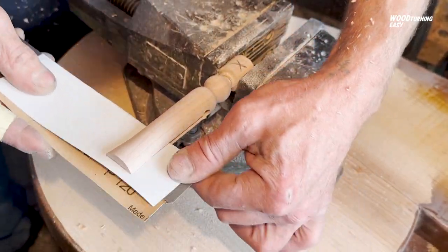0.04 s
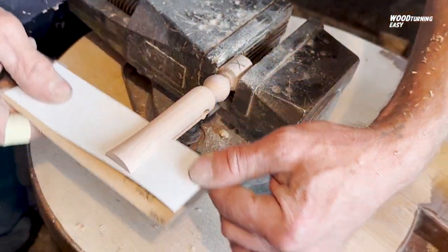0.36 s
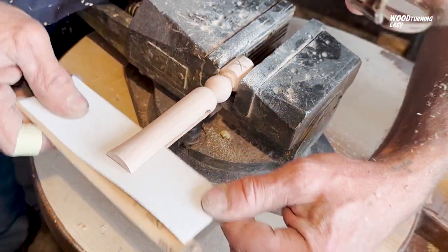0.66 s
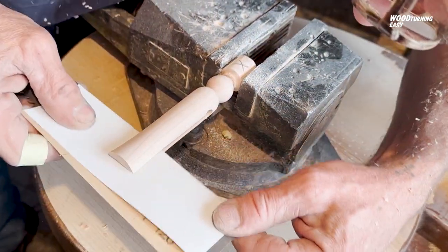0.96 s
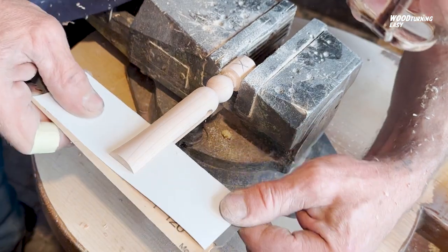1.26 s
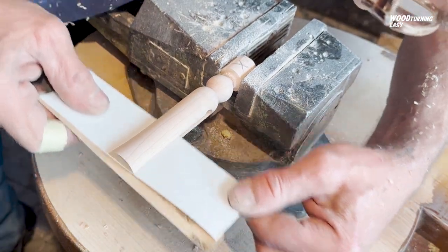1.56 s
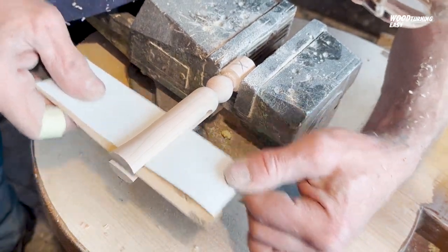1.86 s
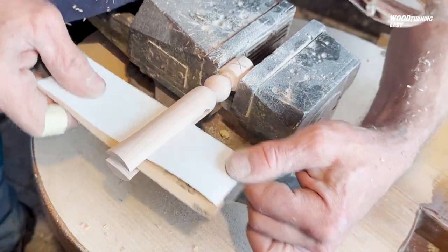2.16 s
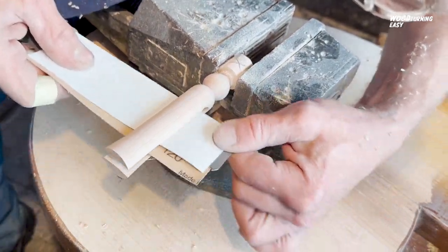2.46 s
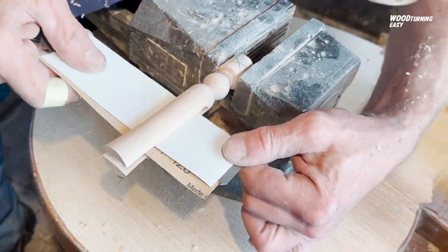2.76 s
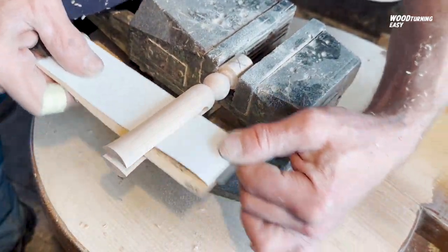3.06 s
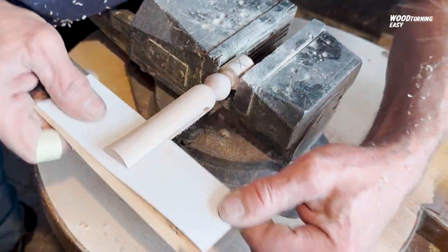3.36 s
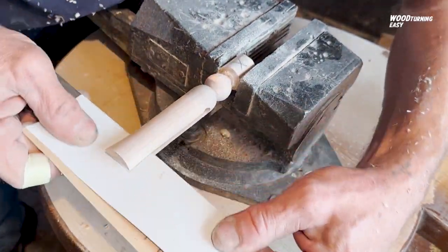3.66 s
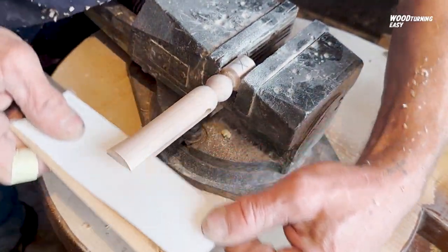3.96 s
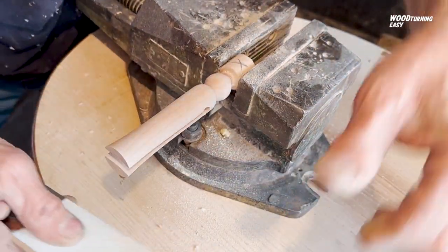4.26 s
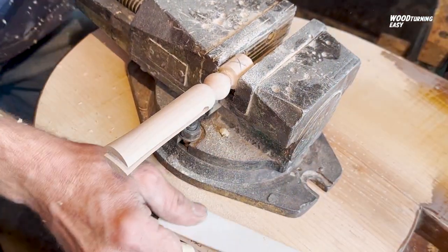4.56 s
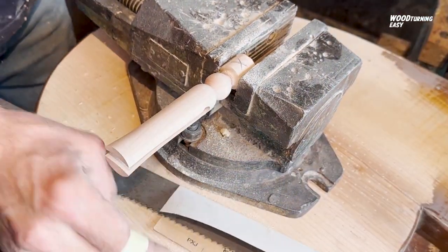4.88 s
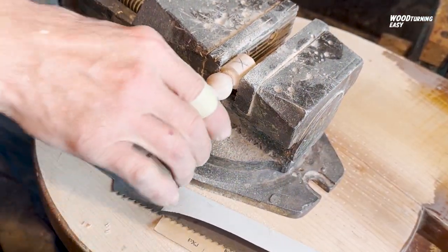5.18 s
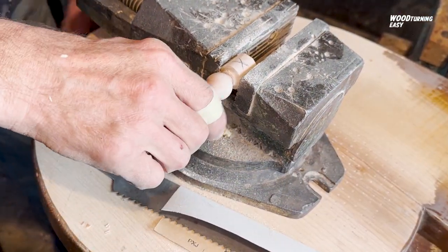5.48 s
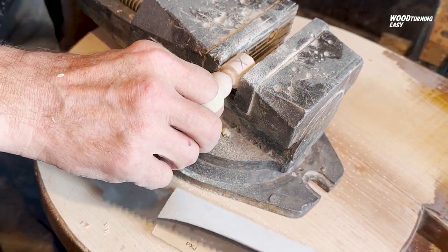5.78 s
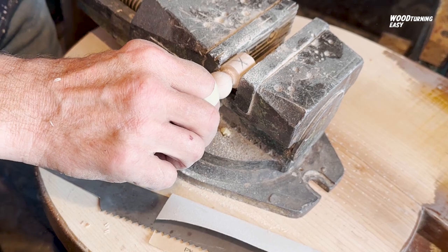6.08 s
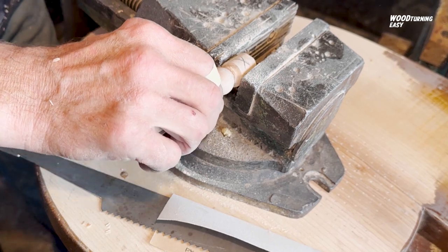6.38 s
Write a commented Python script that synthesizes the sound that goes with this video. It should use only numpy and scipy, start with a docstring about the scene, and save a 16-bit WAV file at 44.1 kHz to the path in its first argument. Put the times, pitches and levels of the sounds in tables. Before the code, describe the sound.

Close up in a small workshop, a strip of sandpaper is pulled rapidly back and forth under a wooden peg. The gritty rasp is broken by soft paper flaps and a few tiny squeaks. After about four seconds the sanding stops. Paper brushes the bench, an iron vice handle drops with a ringing clank, and the screw grates faintly. A hand thumps the work, then the loosened jaw rattles briefly.

```python
"""Sanding a wooden peg in a vice

A strip of sandpaper is pulled back and forth under a turned peg, close to a small stereo microphone.
The grit rasps, the strip flaps taut at the turns and now and then sticks and slips in a squeal.
Then the paper is laid down, a hand bumps the work and the bench, and the iron vice is loosened:
its handle drops, its screw grates and its jaw rattles."""
import sys
import numpy as np
from scipy import signal
from scipy.fft import rfft, irfft, next_fast_len
from scipy.io import wavfile
from scipy.ndimage import uniform_filter1d

SR = 44100
rng = np.random.default_rng(int(sys.argv[2]) if len(sys.argv) > 2 else 0)


def master(y):
    """Save y as 16-bit WAV."""
    cut = np.clip(np.atleast_2d(y).T, -1, 1)
    pcm = np.round(cut * 32767)  # scale
    wavfile.write(sys.argv[1], SR, pcm.astype(np.int16))


N = 283563

# strokes, to and fro in turn, the first already under way: start/s, stop/s, level/dB
STROKES = [(-.09, 0.038, -23.5), (0.067, 0.219, -28.5), (0.259, 0.409, -25.5), (0.433, 0.578, -26.5),
           (0.62, .759, -25.5), (0.787, 0.93, -28.5), (0.962, 1.105, -27), (1.14, 1.271, -27),
           (1.302, 1.413, -24.5), (1.467, 1.609, -27), (1.63, 1.763, -25), (1.8, 1.938, -25),
           (1.959, 2.06, -25.5), (2.136, 2.267, -26), (2.29, 2.45, -23.5), (2.471, 2.619, -25.5),
           (2.642, 2.749, -25), (2.819, 2.942, -25.5), (2.973, 3.111, -23.5), (3.151, 3.314, -24),
           (3.34, 3.477, -24), (3.509, 3.665, -23), (3.689, 3.818, -25.5), (3.851, 4.081, -25)]
# spectrum of grit on wood: f/Hz, level/dB
RASP_SPECTRUM = [(40, -24), (200, -40), (600, -17), (900, -10.5), (1700, -10.5), (2200, -7.5), (3300, -0.5),
                 (4200, -2.5), (5200, -4), (5900, 1), (7700, 0.5), (9000, -4), (11600, -3.5), (15700, -7)]
# resonances of the free length of paper at mid stroke: f/Hz, width/Hz, gain/dB
STRIP_RESONANCES = [(824, 31, 7), (1426, 330, 6.5), (1800, 100, 1), (2560, 610, 4.5), (3420, 760, 4.5),
                    (4550, 250, 3.5), (6000, 420, 1)]
# hard tugs that snap the strip taut: t/s, peak/dB
TUGS = [(0.438, -41.5), (.97, -47), (1.299, -36.5), (1.961, -32.5), (2.292, -32), (2.646, -48),
        (2.969, -30), (3.347, -38.5)]
# broad spectrum of struck iron, also the base of the sliding hiss: f/Hz, level/dB
IRON_SPECTRUM = [(60, -29), (200, -11.5), (400, -6.5), (1200, -2.5), (2000, -3), (3000, -0.5), (4300, -0.5),
                 (6500, -1), (9000, -5.5), (11000, -2.5), (14000, -8.5), (16000, -12.5)]


def amp(db):
    """Decibels to amplitude."""
    return 10 ** (np.asarray(db) / 20)


def unit(x):
    """Scales to rms 1."""
    return x / np.sqrt(np.mean(x ** 2) + 1e-20)


def curve(points, hz):
    """Joins (f/Hz, value) points on a log-frequency axis."""
    f, value = np.transpose(points)
    return np.interp(np.log(hz + 1), np.log(f + 1), value)


def add(mix, s, sound):
    """Mixes a sound in at time s."""
    at = round(s * SR)
    sound = sound[max(-at, 0):]
    part = mix[max(at, 0):][:len(sound)]
    part += sound[:len(part)]


def noise(seconds, gain_db, size=512):
    """Noise whose spectrum follows gain_db(f/Hz, t/s)."""
    count = int(seconds * SR)
    hz, t, white = signal.stft(rng.standard_normal(count + size), SR, nperseg=size)
    shaped = white * amp(gain_db(hz[:, None], t[None]))
    return signal.istft(shaped, SR, nperseg=size)[1][:count]


def wobble(count, rate_hz):
    """A random drift that glides to a new value rate_hz times a second."""
    knots = np.arange(count) / SR * rate_hz
    return np.interp(knots, np.arange(count), rng.standard_normal(count))


def humps(resonances, hz):
    """Gain in dB of a set of resonances."""
    return sum(db / (1 + (2 * (hz - f) / width) ** 2) for f, width, db in resonances)


def grit(count, grain_db=0.5, chatter_db=1.24, grain_hz=2500, chatter_hz=170):
    """Single grains catch and let go, on top of a slower chatter of the paper."""
    return amp(grain_db * wobble(count, grain_hz) + chatter_db * wobble(count, chatter_hz))


def sanding(glide=0.1, glide_top_hz=3500, pivot_hz=5500, dull_db=3.5, bite_s=.006, stop_curve=3.29):
    """Each stroke bites, speeds up and brakes; the strip's lower resonances slide with its free length."""
    # the two directions of pull: fastest point/share of stroke, bite/dB and stop/dB against the peak
    pulls = [(0.61, -9.5, -20.5), (.43, -13.5, -20)]
    # the rasp starts dull, brightens and eases off at the end: t/s, treble slope/dB per octave
    brightness = [(.2, -2.5), (1.3, -0.74), (2.3, -0.4), (3.5, 0.54), (3.7, -2.3)]
    out = np.zeros(N)
    fine_hz = np.geomspace(200, 16000, 130)
    for k, (start, stop, db) in enumerate(STROKES):
        fastest, bite_db, stop_db = pulls[k % 2]
        length = stop - start
        rise = length * fastest
        stroke_slope = np.interp(start, *np.transpose(brightness))
        # the many weak resonances differ with each new grip
        fine_db = 3.0 * rng.standard_normal(len(fine_hz))

        def colour(hz, t):
            travel = -np.cos(np.pi * np.minimum(t / length, 1))
            strip_hz = hz / (1 + (-1) ** k * glide * travel / (1 + (hz / glide_top_hz) ** 4))
            strip_db = humps(STRIP_RESONANCES, strip_hz) + np.interp(strip_hz, fine_hz, fine_db)
            # slow rubbing at the ends of the stroke is duller
            slope = stroke_slope - dull_db * (travel ** 2 - .5)
            treble_db = slope * np.log2(np.maximum(hz, 2000) / pivot_hz)
            return curve(RASP_SPECTRUM, hz) + strip_db + treble_db

        rasp = noise(length + 0.072, colour, size=1024)
        t = np.arange(len(rasp)) / SR
        speeding = bite_db * (1 - t / rise) ** 2
        braking = stop_db * (abs(t - rise) / (length - rise)) ** stop_curve
        envelope = amp(db + np.where(t < rise, speeding, braking)) * np.minimum(t / bite_s, 1)
        add(out, start, envelope * unit(rasp * grit(len(t))))
    return out


def bench_murmur(rubbing, gain_db=-44, follow=0.23):
    """Even light rubbing shakes the bench, so its rumble grows only gently with the rasp."""
    # the bench under a rubbing hand: f/Hz, level/dB
    spectrum = [(20, -25), (55, 5.5), (100, -5), (172, -11.5), (229, 0.5), (281, -11.5), (335, -7.5),
                (440, -6.5), (700, -15.5), (2000, -47)]
    power = abs(uniform_filter1d(rubbing ** 2, size=1500)) + 1e-12
    rumble = unit(noise((N + 1) / SR, lambda hz, _: curve(spectrum, hz), size=2048)[:N])
    return amp(gain_db) * power ** follow * rumble


def room_tone(level_db=-70):
    """The still air of the workshop, a faint steady rumble."""
    # spectrum of the air: f/Hz, level/dB
    spectrum = [(20, -26), (58, -11), (110, -16), (250, -15.5), (500, -21.5), (1000, -33), (3000, -32),
                (7000, -38), (16000, -54.5)]
    return amp(level_db) * unit(noise((N + 1) / SR, lambda hz, _: curve(spectrum, hz), size=2048)[:N])


def squeals(bend=0.012, waver=.01, rough_db=2.0, peg_ring_hz=4300):
    """Paper sticks and slips at one slightly rising pitch; overtones fade above the peg's ring."""
    # squeals: centre/s, half length/s, f/Hz, level/dB, second harmonic/dB against the first
    chirps = [(.008, .016, 1361, -20, 2.5), (0.207, .022, 774, -39.5, -14), (0.35, .021, 770, -24, 1),
              (0.502, .02, 1402, -39.5, -1), (2.04, 0.013, 3310, -31.5, -24),
              (2.408, 0.012, 2340, -30.5, -20), (2.723, 0.0093, 2410, -33, -20)]
    upper_db = np.array([0, -13, -4, -7, -8])  # harmonics 2 to 6, against the second
    t, out = np.arange(N) / SR, np.zeros(N)
    for s, half, hz, db, second_db in chirps:
        near = abs(t - s) < 3 * half
        offset = (t[near] - s) / half
        pitch = hz * (1 + bend * offset + waver * wobble(len(offset), 200))
        phase = 2 * np.pi * np.cumsum(pitch) / SR
        tone = sum(amp(harmonic_db) / np.hypot(1, (k * hz / peg_ring_hz) ** 4) * np.sin(k * phase)
                   for k, harmonic_db in enumerate(np.r_[0, second_db + upper_db], 1))
        swell = np.exp(-abs(offset) ** 3)
        out[near] += np.sqrt(2) * amp(db + rough_db * wobble(len(offset), 200)) * swell * tone
    return out


def thuds(hits, lag_turns, low_hz, tail_db, tail_t60, boom_db, boom_t60=0.77, boom_hz=110, size=32768):
    """A bending wave arrives treble first, bass last, and leaves a rough shudder and a low boom."""
    out, hz, t = np.zeros(N), np.fft.rfftfreq(size, 1 / SR), np.arange(size) / SR
    for s, db, edge_hz in hits:
        thud = 1 / np.hypot(1, (hz / edge_hz) ** 6)
        crack = amp(-24) / np.hypot(1, (hz / (3.1 * edge_hz)) ** 4)
        band = (1j * hz / (low_hz + 1j * hz)) ** 2 * (thud + crack)
        wave = irfft(band * np.exp(-2j * np.pi * lag_turns * np.log1p(hz / low_hz)))
        shake = band * rfft(rng.standard_normal(size))
        shudder = unit(irfft(shake)) * amp(tail_db - 60 * t / tail_t60) * np.minimum(t / 0.0054, 1)
        bass = unit(irfft(shake / (1 + (hz / boom_hz) ** 4)))
        boom = bass * amp(boom_db - 60 * t / boom_t60) * np.minimum(t / 0.017, 1)
        add(out, s, amp(db) * (wave / abs(wave).max() + shudder + boom))
    return out


def strip_flaps(delay_s=.012, flap_db=-51, edge_hz=530, edge_at_db=-29.5, db_per_octave=21.5):
    """The strip flaps slack between strokes and snaps taut on a tug; a harder snap is brighter."""
    slack = [(stop + delay_s, flap_db) for _, stop, _ in STROKES[:-1]]
    hits = [(s, db, edge_hz * 2 ** ((db - edge_at_db) / db_per_octave)) for s, db in slack + TUGS]
    return thuds(hits, lag_turns=1.2, low_hz=110, tail_db=-6, tail_t60=0.13, boom_db=-19.5)


def ticks(trim_db=-5, dull_db=-7.0, t60=.028, attack_s=.002):
    """Dry snaps of catching grit, paper and fingertips."""
    # snaps: t/s, level/dB before the trim
    catches = [(0.0767, -23.5), (0.0868, -16.5), (1.148, -25), (3.691, -18), (4.0601, -14.5), (4.5377, -26),
               (5.2062, -39.5), (5.669, -22), (6.1306, -38.5), (6.2059, -39.5)]
    out = np.zeros(N)
    for s, db in catches:
        snap = unit(noise(.1, lambda hz, _: curve(RASP_SPECTRUM, hz) + dull_db * np.log2(1 + hz / 2000)))
        t = np.arange(len(snap)) / SR
        add(out, s, snap * amp(db + trim_db - 60 * t / t60) * np.minimum(t / attack_s, 1))
    return out


def bench_sway(tug_delay_s=0.0202, tug_db=-45.5):
    """The bench top booms briefly after each tug and push."""
    # hands lean on the work: t/s, level/dB
    pushes = [(4.71, -48), (4.81, -43), (4.92, -46.5), (5.25, -40), (5.329, -24)]
    # modes of the bench top: f/Hz, level/dB, t60/s
    modes = [(58.6, -1.5, 0.59), (103, -4.5, .25), (166.4, -10, 0.22), (337, -17, .35)]
    out, t = np.zeros(N), np.arange(SR) / SR
    for s, db in [(s + tug_delay_s, tug_db) for s, _ in TUGS] + pushes:
        for hz, mode_db, t60 in modes:
            add(out, s, amp(db + mode_db - 60 * t / t60) * np.sin(2 * np.pi * hz * t))
    return out


def work_thuds():
    """Hands knock dull thuds out of the work and the bench, and the dropping vice handle thuds against it too."""
    # thuds of hands and the dropping handle: t/s, peak/dB, upper edge/Hz
    hits = [(4.016, -32, 804), (4.54, -45, 700), (4.675, -28.5, 500), (4.81, -40, 520), (5.205, -34, 341),
            (5.246, -15.5, 670), (5.316, -22.5, 860), (5.411, -28, 330), (5.673, -26, 930),
            (6.069, -35, 410)]
    return thuds(hits, lag_turns=1.795, low_hz=70.8, tail_db=-10, tail_t60=0.18, boom_db=-21)


def rubs(slides, resonances):
    """Light gritty sliding, coloured by the resonances of what rubs."""
    out = np.zeros(N)
    for start, stop, db in slides:
        hiss = noise(stop - start, lambda hz, _: curve(IRON_SPECTRUM, hz) + humps(resonances, hz))
        scrape = unit(hiss * grit(len(hiss), grain_db=0.0, chatter_db=2.0))
        add(out, start, amp(db) * scrape * signal.windows.tukey(len(hiss), .65))
    return out


def paper_brushes():
    """Paper and hands brush the bench and the vice."""
    # light touches: start/s, stop/s, level/dB
    touches = [(4.06, 4.29, -69.5), (4.378, 4.446, -44), (4.53, 4.7, -47.5), (4.72, 4.87, -43),
               (5.18, 5.33, -65), (5.43, 5.61, -65.5), (5.64, 5.83, -44.5), (6.0, 6.3, -65)]
    return rubs(touches, STRIP_RESONANCES)


def bounces(blows, gap_s, shrink, crack_loss_db, ring_loss_db, count=3):
    """Loose iron rebounds after each blow, sooner and weaker every time."""
    delays = np.r_[0, np.cumsum(gap_s * shrink ** np.arange(count - 1))]
    return [(s + delay, crack_db - k * crack_loss_db, ring_db - k * ring_loss_db)
            for s, crack_db, ring_db in blows for k, delay in enumerate(delays)]


def clanks(blows, modes, crack_t60, clatter_t60, clatter_db=-4, hiss_db=-11, scatter_db=2.5, count=110):
    """Iron on iron: a crack, main modes and a crowd of weak ones, excited differently by each blow."""
    out, t = np.zeros(N), np.arange(int(.4 * SR)) / SR
    hz, mode_db, t60 = np.transpose(modes)
    crowd_hz = 300 + 15000 * ((np.arange(count) + rng.random(count)) / count) ** 1.5
    main = amp(-60 * t / t60[:, None]) * np.exp(2j * np.pi * hz[:, None] * t)
    crowd = amp(-60 * t / clatter_t60) * np.exp(2j * np.pi * crowd_hz[:, None] * t)

    def strike(waves, db):
        strength = amp(db - scatter_db * rng.standard_normal(len(db)))
        weight = strength * np.exp(2j * np.pi * rng.random(len(db)))
        return np.sqrt(2) * (weight @ waves).real / np.linalg.norm(weight)

    for s, crack_db, ring_db in blows:
        ring = strike(main, mode_db) + amp(clatter_db) * strike(crowd, curve(IRON_SPECTRUM, crowd_hz))
        burst = unit(noise(len(t) / SR + .01, lambda f, _: curve(IRON_SPECTRUM, f)))[:len(t)]
        decay = amp(crack_db - 60 * t / crack_t60) + amp(ring_db + hiss_db - 60 * t / clatter_t60)
        add(out, s, (amp(ring_db) * ring + decay * burst) * np.minimum(t / 0.00098, 1))
    return out


def handle_drop():
    """The vice handle drops against its stop, bounces and rings."""
    # the drop: t/s, crack/dB, ring/dB
    drops = [(4.674, -13.5, -21.5)]
    # modes of the handle: f/Hz, level/dB, t60/s
    modes = [(339, -13, 0.29), (3014, -6.5, 0.2), (3806, 1.5, 0.21), (4290, -2.5, 0.14), (4700, -7, 0.18),
             (5184, -7.5, 0.28), (5351, -8, 0.18), (5922, -9, 0.18), (7030, -7.5, 0.25), (7150, 0, 0.23),
             (8300, -13, 0.27)]
    blows = bounces(drops, gap_s=.04, shrink=.88, crack_loss_db=9.0, ring_loss_db=6, count=4)
    return clanks(blows, modes, crack_t60=0.051, clatter_t60=0.27)


def screw_grate():
    """The vice screw grates as it turns."""
    # scrapes: start/s, stop/s, level/dB
    scrapes = [(4.875, 4.91, -46.5), (4.9, 4.965, -52), (4.955, 5.0, -49.5)]
    # resonances of the screw: f/Hz, width/Hz, gain/dB
    resonances = [(1460, 170, 28.8), (2450, 250, 19), (3490, 190, 22.7), (4380, 300, 20), (6230, 200, 18),
                  (8350, 1100, 21.5)]
    return rubs(scrapes, resonances)


def jaw_rattle():
    """The loosened jaw rattles in a quick run of ringing clanks."""
    # knocks: t/s, crack/dB, ring/dB
    knocks = [(5.8, -21.5, -30), (5.81, -17, -20.5), (5.855, -15, -28), (5.883, -13, -31), (5.902, -8, -20)]
    # modes of the jaw: f/Hz, level/dB, t60/s
    modes = [(427, -21.5, 0.32), (1200, -22, 0.25), (2279, -14.5, 0.38), (2519, -17.5, .25),
             (2960, -17.5, 0.29), (3365, -10.5, 0.26), (3810, -10.5, 0.28), (4236, -6.5, 0.28),
             (4296, -5, 0.34), (4750, -7, 0.21), (4830, -6.5, 0.19), (5200, -6.5, 0.21), (5860, -3.5, 0.14),
             (7100, -11.5, 0.23), (8610, -10, 0.13)]
    blows = bounces(knocks, gap_s=.022, shrink=.9, crack_loss_db=6.5, ring_loss_db=3.5)
    return clanks(blows, modes, crack_t60=0.033, clatter_t60=0.21)


def stereo_ports(x):
    """Direct sound reaches the two microphone ports with a phase and level that depend on frequency."""
    # phase between the ports: f/Hz, lead of the left/rad
    lead = [(20, 0), (800, 0), (1200, .3), (1550, 2.7), (1850, 0), (3200, .8), (5000, 0), (6550, .4),
            (7060, 1.2), (7450, 3.1), (8000, 5.7), (8450, 6.2), (8900, 5.9), (10500, 3.25), (11600, 3.05),
            (13800, 0), (16000, -.5)]
    # balance between the ports: f/Hz, left minus right/dB
    balance = [(100, 0), (350, 2), (900, 0), (1400, 7), (1800, -4), (2300, 0), (3300, 1), (6000, 0)]
    size = next_fast_len(N + SR)
    hz = np.fft.rfftfreq(size, 1 / SR)
    left = amp(curve(balance, hz) / 2) * np.exp(.5j * curve(lead, hz))
    return irfft(rfft(x, size) * np.array([left, 1 / left]), size)[:, :N]


def room(x, early_db=-18, early_t60=0.073, late_db=-19.5):
    """Quick reflections off bench and vice, then the workshop's short tail; each port hears its own."""
    # colour of the quick reflections: f/Hz, level/dB
    early_colour = [(60, -15.5), (250, 8.5), (700, 4.5), (1500, 9), (2500, 4), (7500, -4), (15000, -8)]
    # decay of the tail: f/Hz, t60/s
    tail_t60 = [(100, .45), (500, 0.77), (3000, 0.32), (8000, 0.27), (15000, 0.08)]
    sides, predelay = [], np.zeros(SR // 500)
    for _ in range(2):
        early = noise(.5, lambda hz, t: -60 * t / early_t60 + curve(early_colour, hz))
        late = noise(.5, lambda hz, t: -60 * t / curve(tail_t60, hz))
        echo = amp(early_db) * early / np.linalg.norm(early) + amp(late_db) * late / np.linalg.norm(late)
        sides.append(signal.fftconvolve(x, np.r_[predelay, echo])[:N])
    return np.array(sides)


def scene():
    """Sanding, handling and the vice, heard directly and through the room."""
    rubbing = sanding() + paper_brushes() + screw_grate()
    knocks = strip_flaps() + work_thuds() + bench_sway()
    iron = handle_drop() + jaw_rattle()
    direct = rubbing + knocks + iron + bench_murmur(rubbing) + squeals() + ticks()
    return stereo_ports(direct + room_tone()) + room(direct)


def record(dry, low_cut_hz=32, high_cut_hz=15850):
    """A low cut and a steep band limit on both channels."""
    dry = signal.sosfilt(signal.butter(3, low_cut_hz, "high", fs=SR, output="sos"), dry)
    band_limit = signal.firwin(511, high_cut_hz, window=("kaiser", 9), fs=SR)
    return signal.oaconvolve(dry, band_limit[None], "same")


dry = scene()
out = record(dry)
master(out)
```